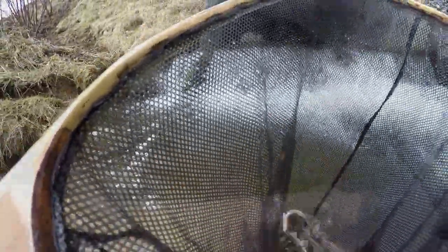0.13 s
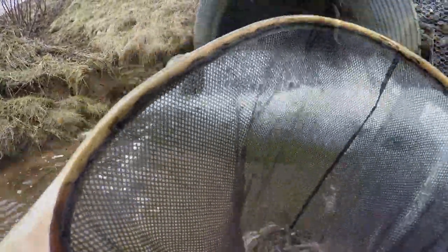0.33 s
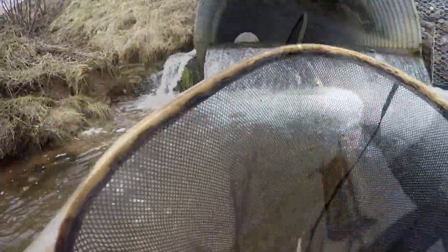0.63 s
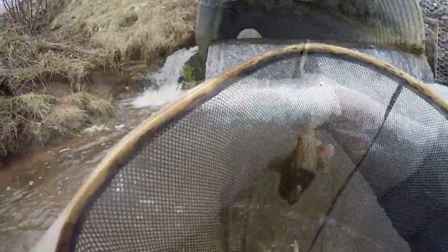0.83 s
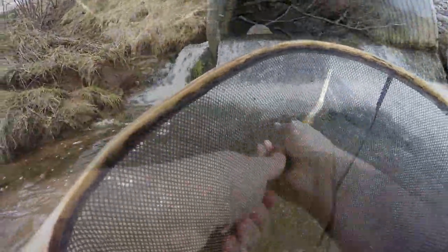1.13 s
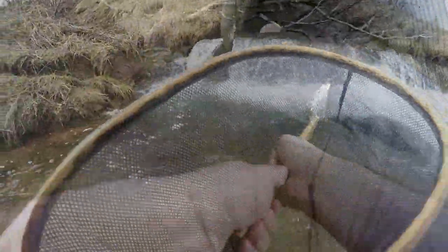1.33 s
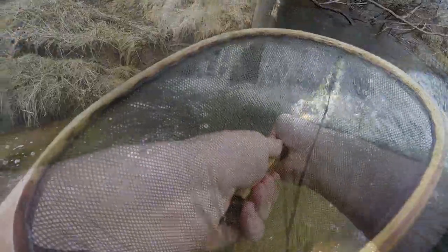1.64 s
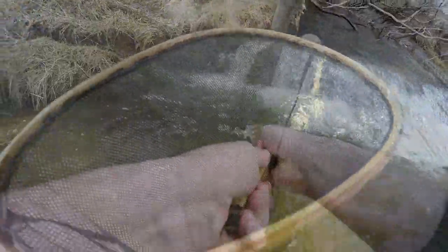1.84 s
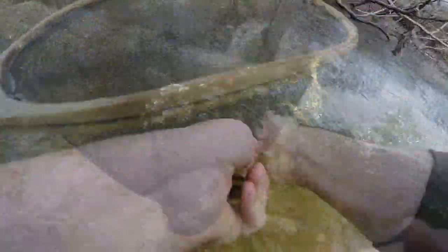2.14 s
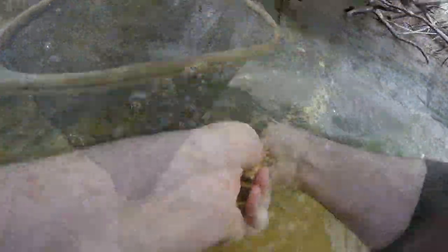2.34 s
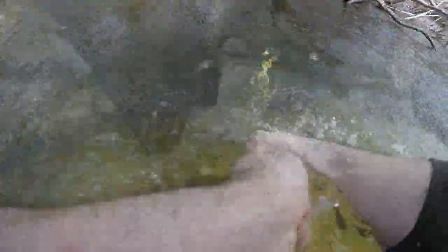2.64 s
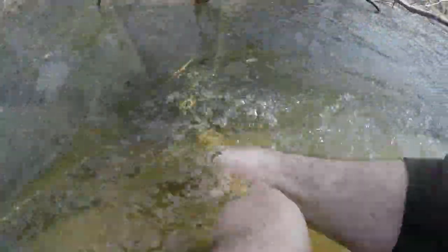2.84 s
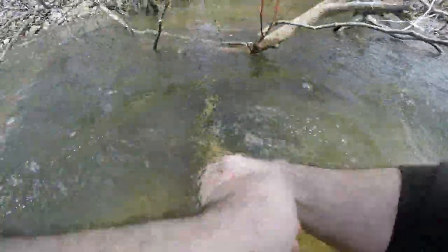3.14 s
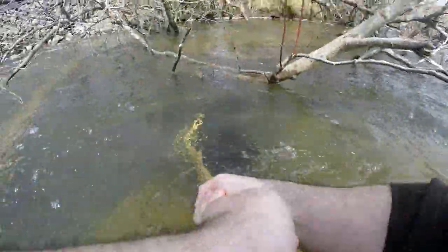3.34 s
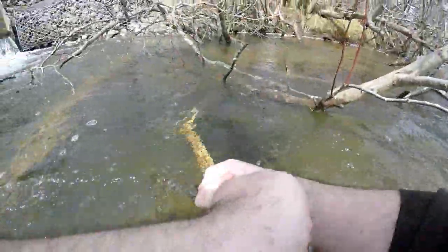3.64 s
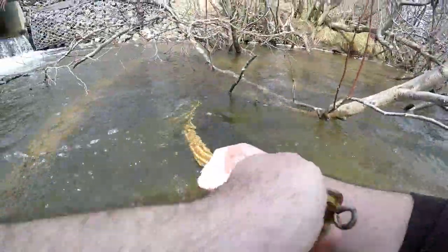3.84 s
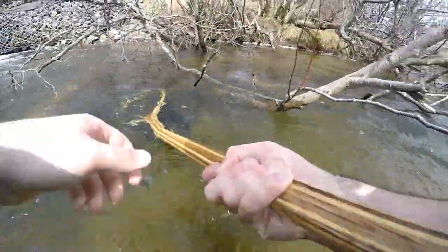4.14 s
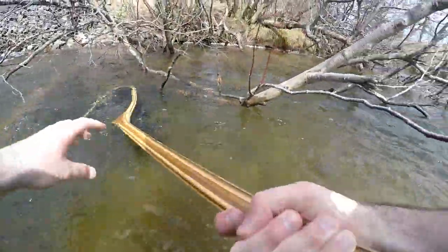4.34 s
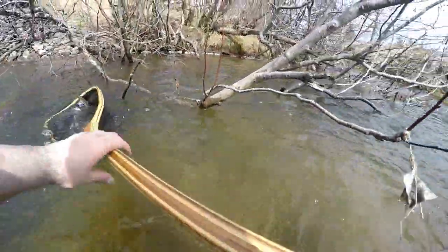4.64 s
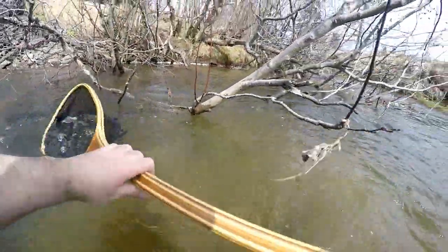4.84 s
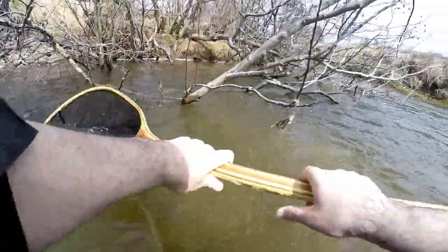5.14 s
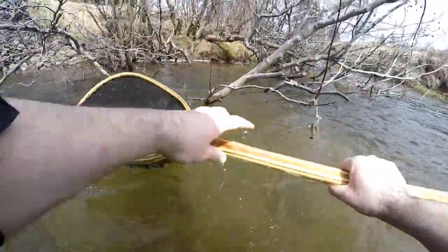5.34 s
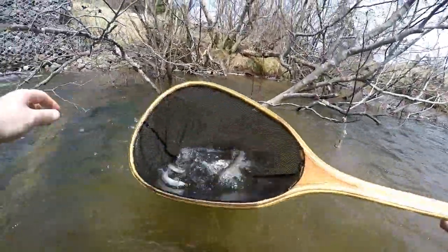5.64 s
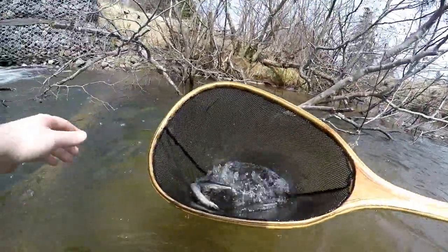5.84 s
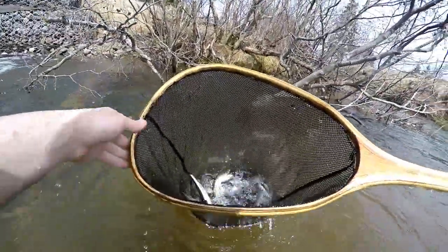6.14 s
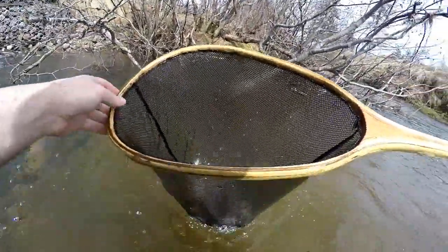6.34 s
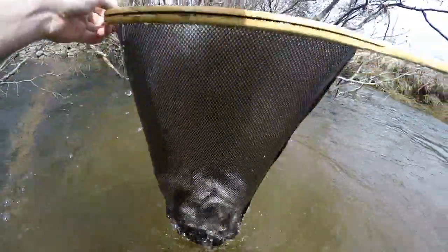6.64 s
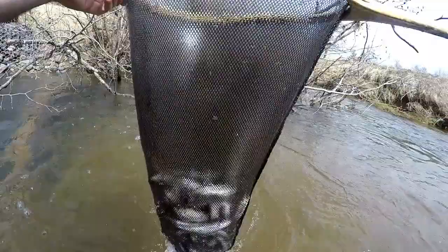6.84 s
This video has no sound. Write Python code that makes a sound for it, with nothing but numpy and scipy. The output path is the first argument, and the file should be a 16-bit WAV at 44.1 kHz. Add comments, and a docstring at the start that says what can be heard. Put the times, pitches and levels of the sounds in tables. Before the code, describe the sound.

Water rushes over a spillway, then dulls as close knocks and rubs lead to a dripping net with flapping fish.

```python
"""Water pours over a spillway, hissing and bubbling, heard by a small hard-cased camera worn on the chest.
The chest turns away over a pool, and the rush gets duller. Hands and a wooden net handle knock, rub
and jolt the case. The net is lifted out, dripping and flapping with fish. Body movement and air
rumble underneath, and a few flecks of spray tick near the microphone."""
import sys
import numpy as np
from scipy import signal
from scipy.fft import rfft, irfft
from scipy.io import wavfile
from scipy.ndimage import uniform_filter1d

SR = 44100
rng = np.random.default_rng(int(sys.argv[2]) if len(sys.argv) > 2 else 0)


def store_wav(level_fs):
    """Save 16-bit WAV to argv[1]."""
    pcm = np.round(np.clip(np.atleast_2d(level_fs), -1, 1) * 32767)
    wavfile.write(sys.argv[1], SR, pcm.T.astype(np.int16))


N = 308700  # 7 seconds

# How loud the spillway is over time: start_s, level_db
SPILLWAY_LEVELS = [(0, -35.5), (1, -35), (2, -36.5), (2.9, -36), (3.1, -40), (3.39, -41.5), (3.43, -45),
                   (4.3, -44.5), (4.7, -42.5), (5.1, -46), (6.2, -44), (7, -46)]
# The spillway's balance of low and high sound when facing it: pitch_hz, relative_db
FACING_TONE = [(60, -47), (90, -8.5), (213, -7.5), (653, -9.5), (883, -25.5), (1030, -17), (1220, -22),
               (1610, -3.5), (1960, 1.5), (2710, -6.5), (3600, -14), (4600, -16.5), (4900, -23),
               (6400, -19.5), (8000, -27), (15500, -41.5)]
# The same when turned away: pitch_hz, relative_db
AWAY_TONE = [(120, -6.5), (200, -0.5), (263, -7.5), (564, -5.5), (641, -6.5), (702, -4), (769, -9.5),
             (1070, -6.5), (1230, -13.5), (1710, -0.5), (2170, -12.5), (2900, -8), (3610, -14.5),
             (4410, -17.5), (15500, -42)]
# Pitches that the microphone opening boosts or weakens: pitch_hz, width_hz, relative_db
MIC_OPENING = [(4540, 110, 14), (5800, 190, -25), (7050, 480, 11.5), (9300, 670, 10), (11900, 220, 20),
               (13500, 1300, 3)]
# Knocks on the case: start_s, shell_db, pitch_hz, snap_db, hollow_db, treble_db, push_db
KNOCK_HITS = [(1.419, -30, 2060, -36, -27, -51, -17), (1.496, -16, 2150, -17.5, -20, -50, -16.5),
              (1.5625, -21, 2070, -22.5, -23, -36.5, -17.5), (1.6688, -14.5, 3700, -14.5, -20.5, -35, -9.5),
              (1.74, -9.5, 3600, -21, -14.5, -38, -8.5), (1.8279, -14, 3330, -24, -17.5, -51, -9),
              (1.9611, -15, 2790, -23, -20, -38.5, -15.5), (2.0298, -18, 1870, -18.5, -20, -43, -21),
              (2.0478, -33, 1930, -30, -26, -43.5, -14.5), (2.5636, -39, 1990, -36.5, -28, -55, -19),
              (2.6475, -12.5, 2080, -24.5, -21, -54, -24), (2.824, -9, 1560, -20.5, -9.5, -61, -9.5),
              (3.0738, 4.5, 2580, 0, -7, -6, 6.5), (3.3088, -25, 1010, -40, -24.5, -70, -24.5),
              (3.4073, -21.5, 1060, -24.5, -33, -40.5, -27), (3.4488, -24, 1720, -19.5, -25, -67, -21),
              (3.8228, -32.5, 1450, -49, -55, -65, -30), (4.2146, -41, 1070, -48, -13.5, -55, -24),
              (4.2218, -14, 1800, -22, -13, -68, -12), (4.2447, -33, 1830, -48, -20, -65, -25),
              (4.386, -33, 1810, -37.5, -35, -57, -24), (4.4298, -29, 1860, -31, -31, -61, -17.5),
              (4.4945, -41, 1590, -47, -29, -67, -18), (4.563, -42, 1810, -47, -42, -70, -18),
              (4.7518, -29, 1920, -21, -29, -55, -19), (5.013, -16.5, 2180, -14, -18.5, -35, -20),
              (5.0251, -43, 1720, -34.5, -31, -56, -9.5), (5.657, -41, 1860, -45, -34.5, -54, -27),
              (5.7199, -16, 2100, -17.5, -22.5, -57, -18.5), (5.8186, -33, 1570, -36.5, -43, -43, -24),
              (5.9983, -12.5, 3760, -9, -19.5, -34.5, -18.5)]
# The notes the case rings at when knocked: pitch_hz, relative_db, ring_time_s
CASE_NOTES = [(1050, 3, 0.021), (1540, -3, 0.021), (1800, -1, 0.026), (2095, -10, 0.033),
              (2460, -5, 0.0098), (2630, 7.5, 0.018), (2770, -4, 0.05), (2830, 11.5, 0.024),
              (3597, -1.5, 0.0087), (4300, -12.5, 0.034)]
# How loud the water running off the net is: start_s, level_db
DRIP_LEVELS = [(4.4, -81), (4.7, -47.5), (5, -55), (5.3, -63), (5.7, -41.5), (5.9, -40), (6.1, -44),
               (6.3, -41.5), (6.6, -45), (7, -74)]
# The tone of drops heard through the case: pitch_hz, relative_db
DRIP_TONE = [(250, -40), (500, 2.5), (850, -25), (1220, -17), (1840, 10.5), (2400, 1), (3500, 3),
             (4600, -6), (5850, -11), (7000, -11), (8200, -18.5), (11000, -24), (13500, -27), (15500, -28)]
# Single loud drops and fish flaps: start_s, peak_db, pitch_hz, spray_db
SPLAT_HITS = [(3.537, -36.5, 1050, -53), (3.5578, -40, 1070, -57), (5.1636, -31, 2770, -54),
              (5.374, -56, 1790, -42), (5.5025, -36, 1930, -40), (5.691, -35, 1760, -41),
              (5.7673, -29.5, 1850, -45), (5.8208, -36, 1990, -42), (5.8408, -31.5, 1800, -35),
              (5.8945, -35, 2070, -40), (5.9453, -32, 3320, -39), (6.0079, -28, 1840, -37),
              (6.154, -40, 1730, -36), (6.19, -29.5, 1730, -38), (6.237, -29.5, 1980, -33),
              (6.255, -30, 3320, -47), (6.325, -34, 1680, -30), (6.35, -31, 2770, -35),
              (6.4483, -31, 1740, -59), (6.476, -33, 1780, -59), (6.4971, -32, 1910, -56),
              (6.5603, -27, 1800, -44), (6.63, -31, 1800, -55), (6.796, -37.5, 1800, -42)]
# Skin and sleeve dragging over the case: start_s, rise_s, fall_s, level_db, pitch_hz, width_hz
RUB_STROKES = [(2.018, 0.036, 0.075, -35, 396, 800), (2.591, 0.028, 0.057, -30, 2390, 5000),
               (3.66, 0.093, 0.18, -43.5, 130, 250), (4.02, .14, 0.15, -38.5, 730, 452),
               (4.0, 0.094, 0.34, -35, 192, 350), (4.19, 0.032, 0.056, -26.5, 530, 1000),
               (4.27, 0.05, 0.027, -50, 900, 1600), (4.44, .11, 0.072, -40.5, 248, 450),
               (4.5, .12, 0.079, -46, 945, 900), (4.559, 0.044, 0.078, -61, 3450, 6000),
               (5.0, .015, 0.046, -31.5, 690, 2000), (5.22, 0.099, 0.055, -40.5, 1400, 2550)]
# How loud body movement and air on the microphone are: start_s, level_db
RUMBLE_LEVELS = [(0, -49), (0.9, -47.5), (1.17, -40), (1.65, -45), (1.81, -44), (2.34, -42.5),
                 (2.59, -22.5), (2.81, -31), (3.23, -35.5), (3.68, -31), (3.9, -36), (4.8, -35),
                 (5.77, -43), (6.02, -34.5), (6.12, -41), (6.53, -43), (7, -38.5)]
# The tone of that rumble: pitch_hz, relative_db
BODY_TONE = [(8.8, -55), (15, 8.5), (44, 0), (81, -7.5), (135, -10), (169, -21.5), (300, -25), (390, -95),
             (660, -120)]
# Soft jolts of the chest strap: start_s, peak_db, pitch_hz
STRAP_JOLTS = [(0.15, -27.5, 40.4), (0.606, -29, 37), (2.409, -16.5, 46.7), (2.489, -35, 43.1),
               (2.557, -32, 51.6), (2.616, -9.5, 49.5), (2.697, -18.5, 33), (2.848, -18, 30.8),
               (4.617, -27.5, 40.4), (5.467, -23, 43.8), (5.889, -25.5, 42.3), (6.186, -30, 32.3),
               (6.311, -23.5, 44.5), (6.737, -18.5, 46), (6.919, -31, 43.1)]
# Flecks of spray landing near the microphone: start_s, peak_db
SPRAY_HITS = [(0.2139, -37), (0.415, -41), (0.4589, -38), (0.5282, -29.5), (0.8345, -36), (1.1882, -41)]


def spillway():
    """Falling water hisses and bubbles; it sounds duller once the chest is in the way."""
    frames, hz = N // 128 + 5, np.fft.rfftfreq(512, 1 / SR)
    # Patches of the hiss grow louder and softer at random, and the treble flickers.
    patches = uniform_filter1d(rng.standard_normal((257, frames)), size=8, axis=0)
    patches = normalise(uniform_filter1d(patches, size=20, axis=1))
    flicker = wander(frames, smooth=4) * np.clip(hz[:, None] / 9000, 0, 1)
    noise = rng.standard_normal(frames * 128)
    bands = signal.stft(noise, nperseg=512, noverlap=384)[2][:, :frames]
    bands = bands * gain_of(1.27 * patches + 0.81 * flicker)
    hiss = signal.istft(bands, nperseg=512, noverlap=384)[1][:N]
    water = normalise(hiss) + 0.24 * bubbles(per_s=900, spread_db=4.5, cycles=4.2)
    turn_s, turn_length_s = 3.39, 0.023
    away_share = np.interp(np.arange(N) / SR, [turn_s, turn_s + turn_length_s], [0.096, 0.83])
    facing = np.sqrt(1 - away_share) * shape_tone(water, FACING_TONE)
    away = np.sqrt(away_share) * shape_tone(water[::-1], AWAY_TONE, opening_share=0.48)
    return gain_curve(SPILLWAY_LEVELS) * (facing + away)


def bubbles(per_s, spread_db, cycles):
    """Bubbles of all sizes ring at random times, each a short note that rises a little."""
    out, pitches = np.zeros(N), np.geomspace(300, 15000, num=24)
    strength = gain_of(spread_db * np.minimum(rng.exponential(1, N), 4))
    pops = strength * (rng.random(N) < per_s / SR)
    which_pitch = rng.integers(0, len(pitches), N)
    for k, hz in enumerate(pitches):
        age = np.linspace(0, 1, round(cycles * SR / hz) + 2)
        note = np.sin(2 * np.pi * cycles * age * (1 + .06 * age)) * age ** .6 * np.exp(-3.5 * age)
        note *= np.sqrt(hz) / np.linalg.norm(note)  # spreads the power evenly from low to high
        out += signal.oaconvolve(pops * (which_pitch == k), note)[:N]
    return normalise(out)


def case_knocks():
    """Each knock is a tiny rattle that rings the shell, snaps the lid and booms in the hollow inside."""
    out, t = np.zeros(N), np.arange(2000) / SR
    lid_hz, hollow_hz = 3740, 560
    for start_s, shell_db, hz, snap_db, hollow_db, treble_db, push_db in KNOCK_HITS:
        rattle = rng.standard_normal(len(t)) * np.exp(-((t - .002) / 0.0018) ** 2)
        shell = set_peak(keep_band(rattle, 1540, 3150)) + 2.13 * case_ring(rattle, hz, 0.13)
        snap = set_peak(keep_band(rattle, 2560, 4100)) + 0.8 * case_ring(rattle, lid_hz, 0.19)
        boom = resonate(resonate(rattle, hollow_hz, 890), hollow_hz, 72.5)
        hollow = keep_band(rattle, 230, 1150) + 1.1 * boom
        add(out, start_s, set_peak(keep_band(shell, 700, 3230), shell_db))
        add(out, start_s, set_peak(keep_band(snap, 2050, 6850), snap_db))
        add(out, start_s, set_peak(keep_band(hollow, 190, 3500), hollow_db))
        add(out, start_s, set_peak(keep_band(rattle, 5200, 10400), treble_db))
        add(out, start_s, microphone_push(push_db))
    return out


def case_ring(rattle, hz, reach_octaves):
    """A blow wakes mostly those notes of the case that lie near its own pitch."""
    note_hz, note_db, _ = np.transpose(CASE_NOTES)
    rings = np.array([set_peak(resonate(rattle, f, 2.33 / ring_s)) for f, _, ring_s in CASE_NOTES])
    nearness = np.exp(-(np.log2(note_hz / hz) / reach_octaves) ** 2)
    return (gain_of(note_db) * nearness) @ rings


def microphone_push(push_db):
    """A knock pushes the microphone's thin membrane, which swings slowly back: a low thump."""
    rise_s, shove_lag_s, shove_above_db = 0.0019, 0.0012, -3
    age = np.maximum(np.arange(4000) / SR - .002, 0) / rise_s
    if push_db > shove_above_db:  # the whole case shifts and stays there
        step = 1 - np.exp(-(3.9 * np.maximum(age - shove_lag_s / rise_s, 0)) ** 2)
        return gain_of(push_db) * cut_lows(step, 33, order=3)
    pulse = -age ** 2 * np.exp(2 - 2 * age)
    return gain_of(push_db) * cut_lows(pulse, 36, order=4)


def dripping_net():
    """Drops fall from the mesh in clumps over a fine sizzle."""
    clumps = gain_of(4.9 * wander(N, smooth=450))
    patter = np.sqrt(clumps) * bubbles(per_s=4000, spread_db=2.5, cycles=7.1)
    plinks = 0.52 * bubbles(per_s=500, spread_db=7.5, cycles=17)
    sizzle = 1.36 * clumps * rng.standard_normal(N)
    return gain_curve(DRIP_LEVELS) * shape_tone(patter + plinks + sizzle, DRIP_TONE, opening_share=0.52)


def splats():
    """A big drop or a fish flap makes a short, wet ring and a puff of spray."""
    out, t = np.zeros(N), np.arange(1200) / SR
    fade = gain_of(-60 * t / 0.023) * np.minimum(t / 0.00096, 1)
    for start_s, peak_db, hz, spray_db in SPLAT_HITS:
        noise = rng.standard_normal(len(t))
        ring = resonate(resonate(noise * fade, hz, 0.26 * hz), hz, 0.047 * hz)
        wet = shape_tone(noise, DRIP_TONE)
        splat = set_peak(ring) + 0.18 * wet * fade
        spray = normalise(cut_lows(wet, 6000)) * fade
        add(out, start_s, set_peak(splat, peak_db) + gain_of(spray_db) * spray)
    return out


def case_rubs():
    """Skin and sleeve slip unevenly over the case; each scrape swells and dies away."""
    out, slips_per_s = np.zeros(N), 600
    for start_s, rise_s, fall_s, level_db, hz, width_hz in RUB_STROKES:
        t = np.arange(0, rise_s + fall_s, 1 / SR)
        slips = rng.random(len(t)) < slips_per_s / SR
        scrape = rng.standard_normal(len(t)) * (0.24 + 3 * slips)
        for _ in range(3):  # each pass narrows the sound around its pitch
            scrape = resonate(scrape, hz, width_hz)
        swell_db = np.interp(t, [0, rise_s, rise_s + fall_s], [-24, 0, -24])
        add(out, start_s, gain_of(level_db + swell_db) * normalise(scrape))
    return out


def body_rumble():
    """Body movement and air make a lumpy rumble; each strap jolt swings a few times."""
    lumps = gain_of(4.5 * wander(N, smooth=2500))
    out = gain_curve(RUMBLE_LEVELS) * shape_tone(lumps * rng.standard_normal(N), BODY_TONE)
    for start_s, peak_db, hz in STRAP_JOLTS:
        cycles = np.arange(0, 3, hz / SR) - 1.2  # zero at the strongest swing
        jolt = -np.cos(2 * np.pi * cycles) * np.exp(-(cycles / 0.88) ** 2)
        add(out, start_s, gain_of(peak_db) * jolt)
    return out


def spray_flecks():
    """Each fleck of spray lands with a tiny, bright tick."""
    out, t = np.zeros(N), np.arange(400) / SR
    for start_s, peak_db in SPRAY_HITS:
        tick = rng.standard_normal(len(t)) * gain_of(-60 * t / 0.015)
        add(out, start_s, set_peak(cut_lows(tick, 6500), peak_db))
    return out


def gain_of(db):
    """Turns decibels into a number to multiply a sound by."""
    return 10 ** (np.asarray(db) / 20)


def gain_curve(levels):
    """Joins (time, level) points into one gain for every sample."""
    return gain_of(np.interp(np.arange(N) / SR, *np.transpose(levels)))


def normalise(x):
    """Scales a signal so its average strength (rms) is 1."""
    return x / np.sqrt(np.mean(x ** 2) + 1e-20)


def set_peak(x, db=0):
    """Scales a sound so its highest peak is at db."""
    return gain_of(db) * x / abs(x).max()


def wander(length, smooth):
    """A random curve; smoothing over more samples makes it slower."""
    return normalise(uniform_filter1d(rng.standard_normal(length), size=smooth))


def add(mix, start_s, sound):
    """Mixes a sound in at its start time."""
    part = mix[round(start_s * SR):][:len(sound)]
    part += sound[:len(part)]


def keep_band(x, low_hz, high_hz):
    """Keeps the sound between two pitches."""
    return signal.sosfilt(signal.butter(2, [low_hz, high_hz], "band", fs=SR, output="sos"), x)


def cut_lows(x, hz, order=2):
    """Weakens the sound below hz; a higher order cuts more sharply."""
    return signal.sosfilt(signal.butter(order, hz, "high", fs=SR, output="sos"), x)


def shape_tone(x, tone, opening_share=0):
    """Applies a tone table and a share of the microphone opening's peaks and dips."""
    hz = np.fft.rfftfreq(len(x), 1 / SR)
    point_hz, point_db = np.transpose(tone)
    tone_db = np.interp(np.log(hz + 1), np.log(point_hz + 1), point_db)
    opening_db = sum(db / (1 + (2 * (hz - f) / width) ** 2) for f, width, db in MIC_OPENING)
    return normalise(irfft(rfft(x) * gain_of(tone_db + opening_share * opening_db), len(x)))


def resonate(x, hz, width_hz):
    """Makes a sound ring at hz; a smaller width rings longer."""
    spin = np.exp(2j * np.pi * hz * np.arange(1, len(x) + 1) / SR)
    decay = np.exp(-np.pi * width_hz / SR)
    return 2 * (spin * signal.lfilter([1 - decay], [1, -decay], x / spin)).real


def scene():
    """All the sounds meet at one microphone."""
    mix = spillway() + case_knocks() + dripping_net() + splats()
    return (mix + case_rubs() + body_rumble() + spray_flecks())[None]


def record(dry):
    """The hardest knock overloads the input, then the very highest treble is cut."""
    clipped, top_hz = np.clip(dry, -.93, .93), 15250
    treble_cut = signal.firwin(255, top_hz, window=("kaiser", 9), fs=SR)
    return signal.oaconvolve(clipped, treble_cut[None], "same")


dry = scene()
out = record(dry)
store_wav(out)
```